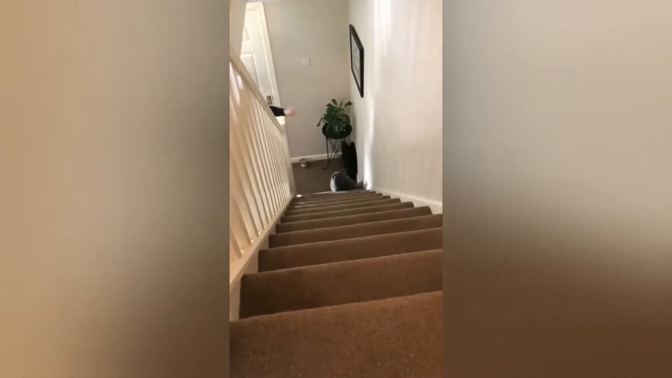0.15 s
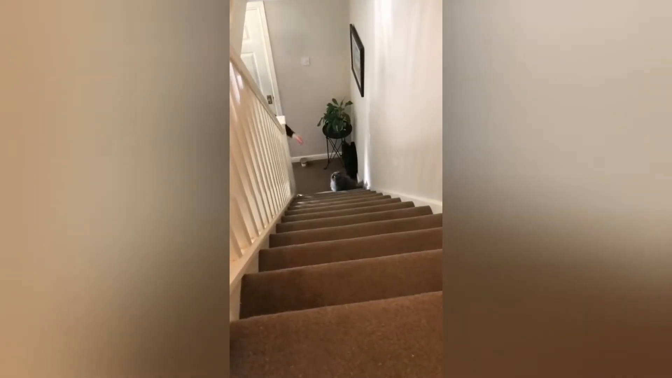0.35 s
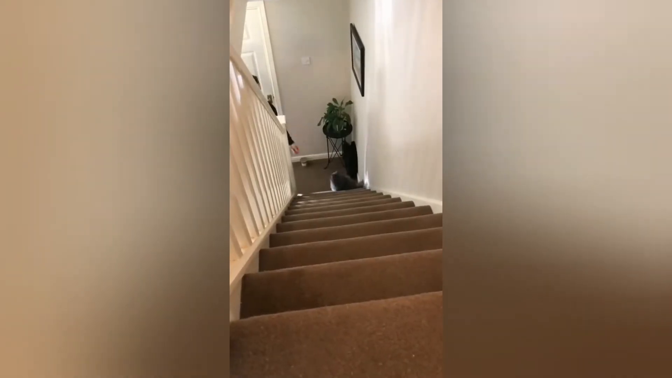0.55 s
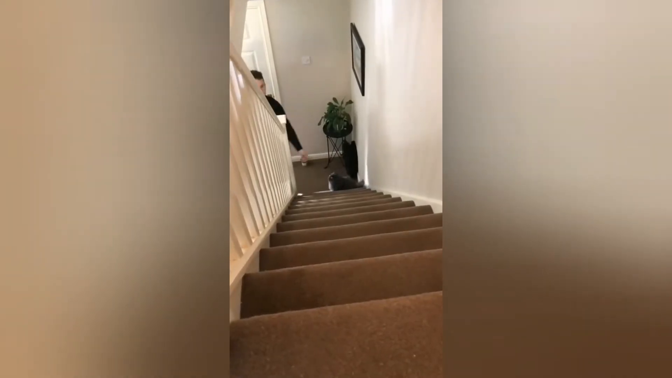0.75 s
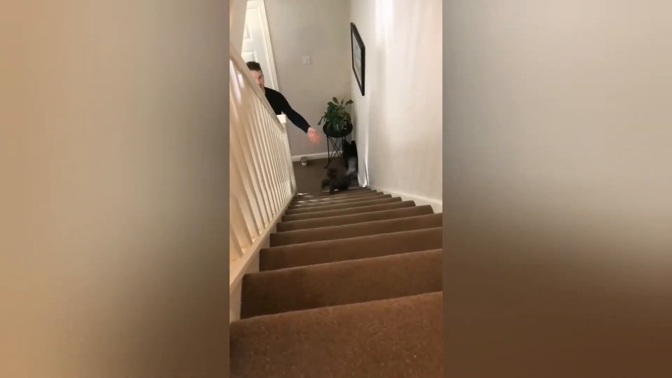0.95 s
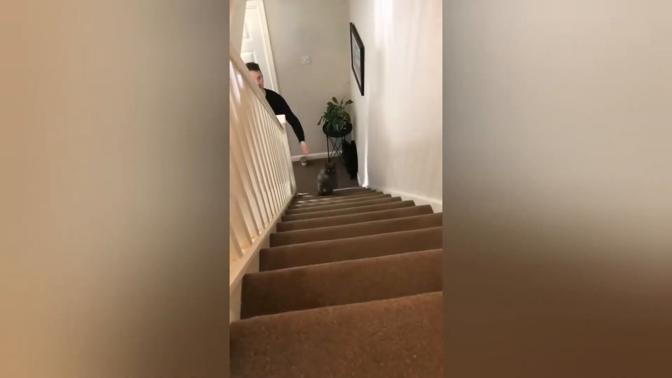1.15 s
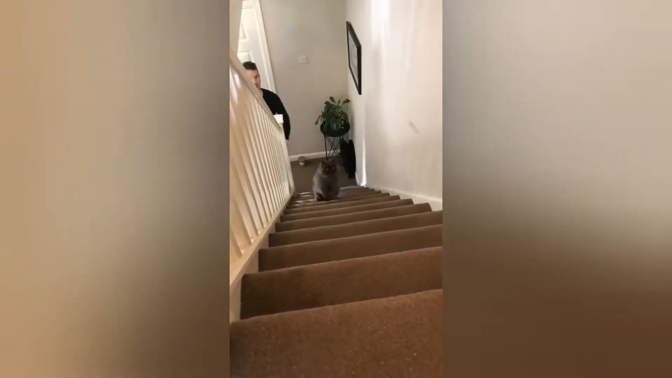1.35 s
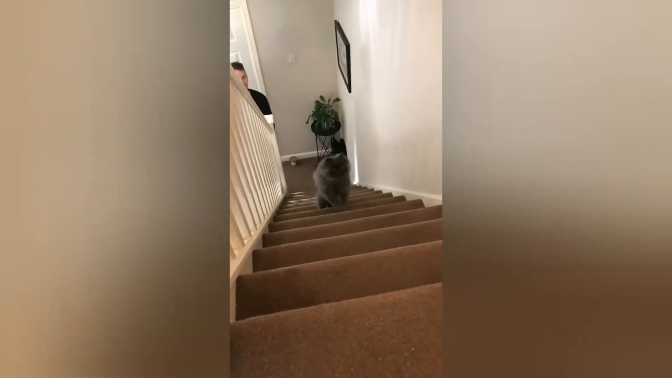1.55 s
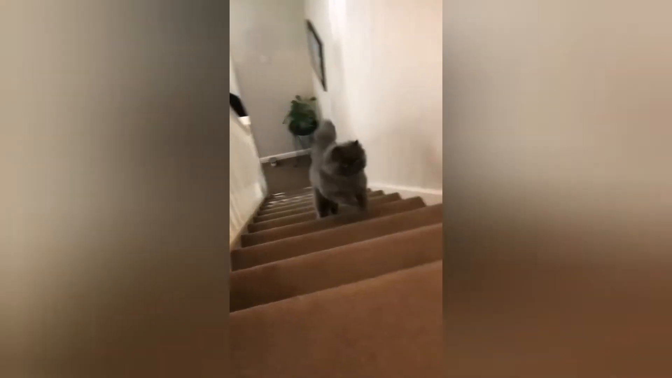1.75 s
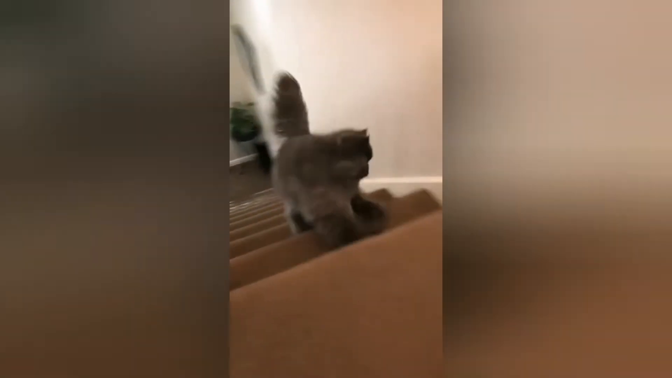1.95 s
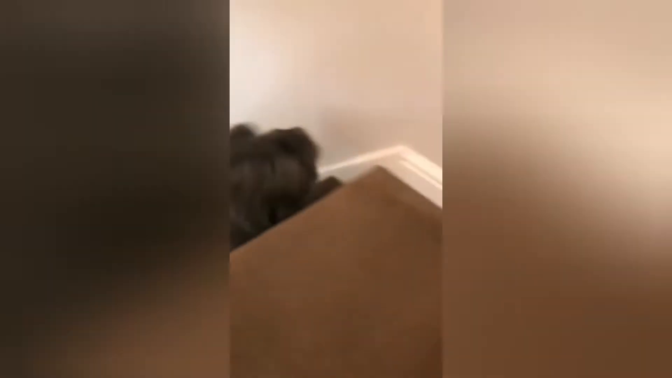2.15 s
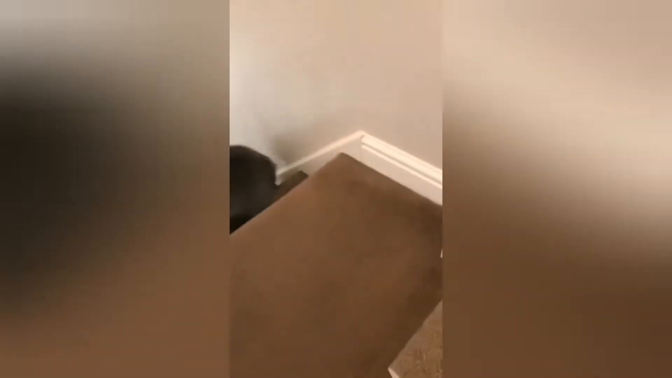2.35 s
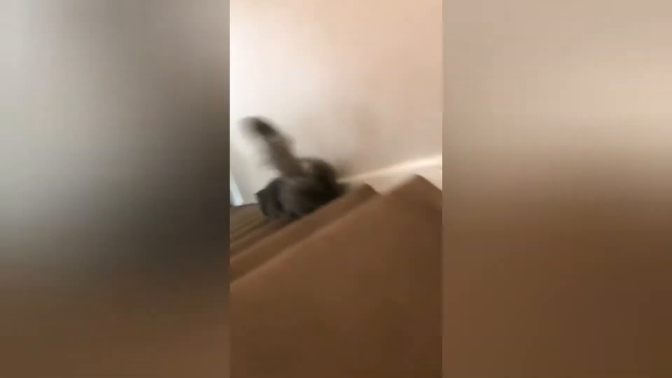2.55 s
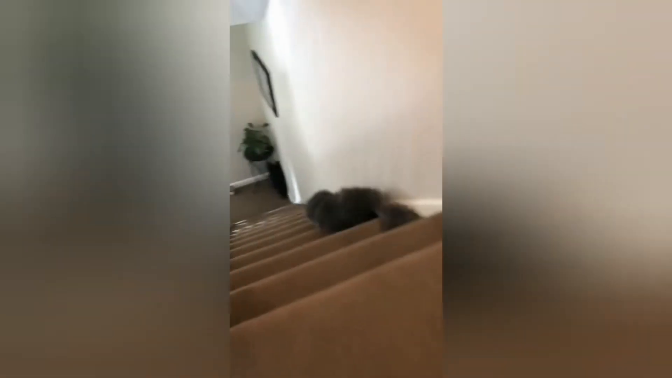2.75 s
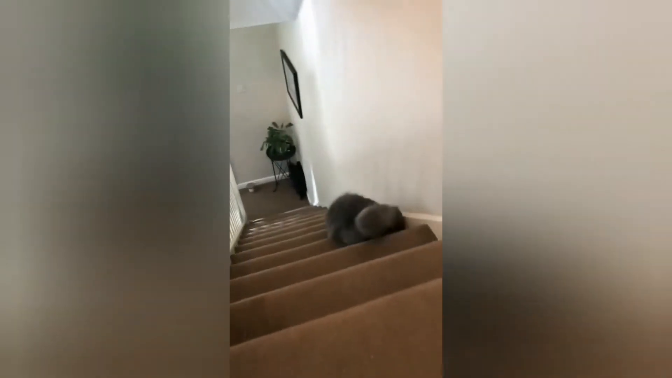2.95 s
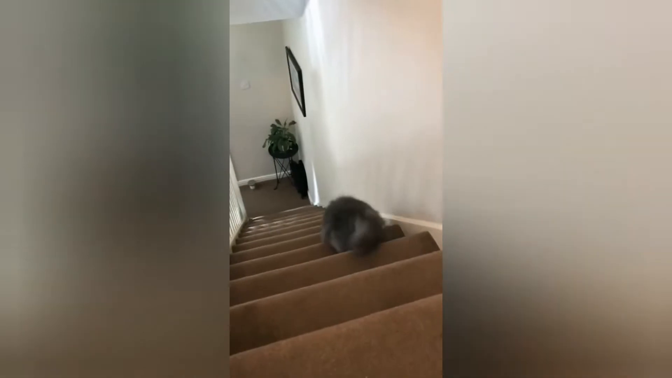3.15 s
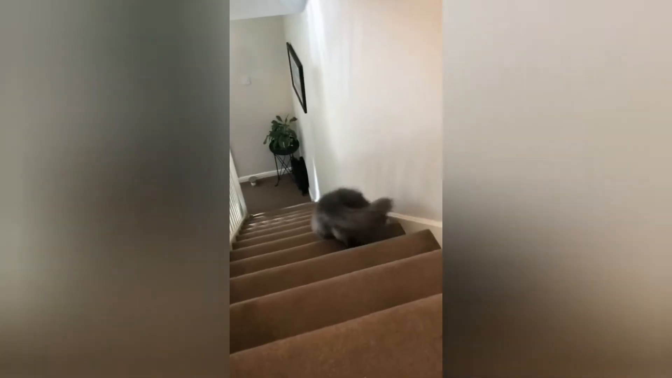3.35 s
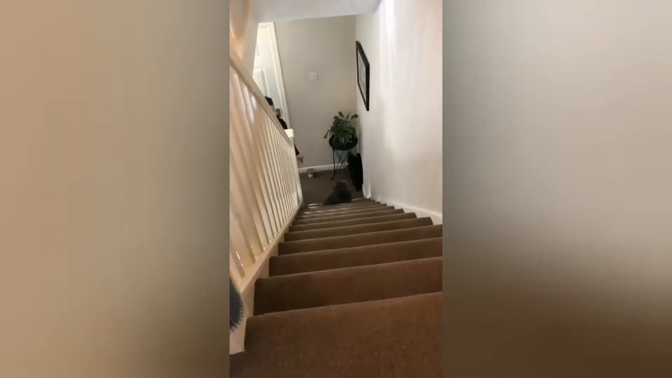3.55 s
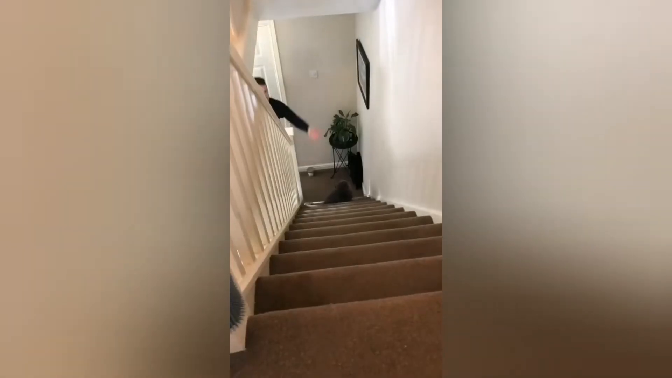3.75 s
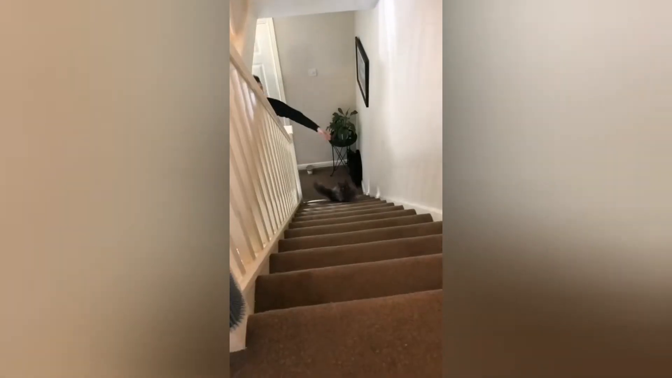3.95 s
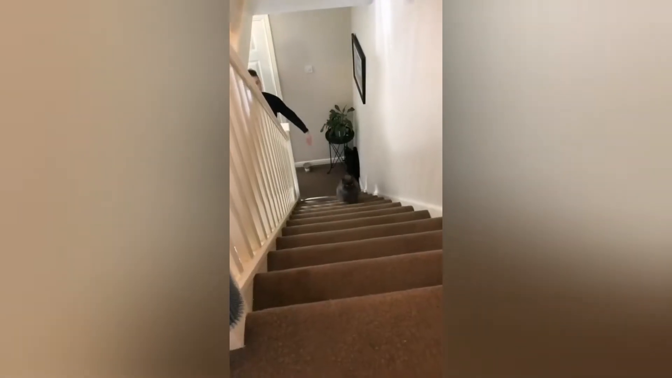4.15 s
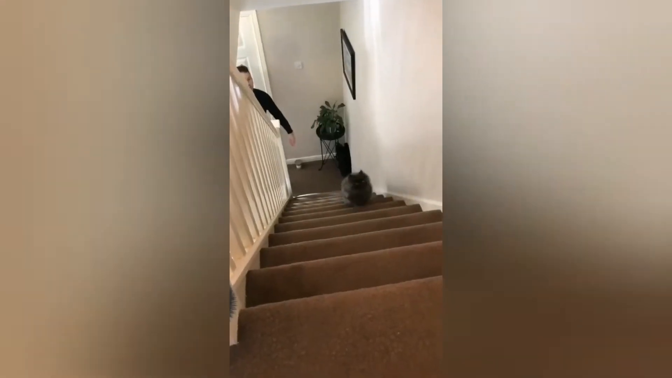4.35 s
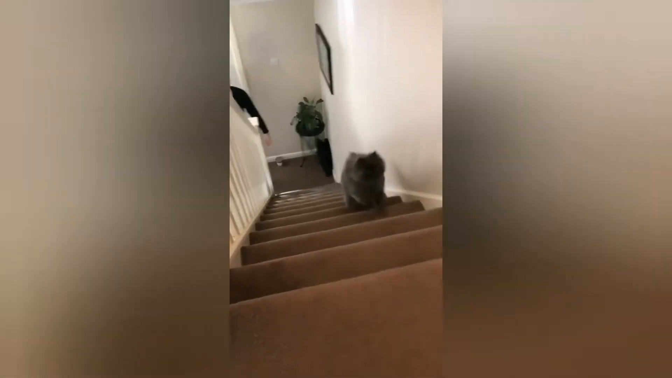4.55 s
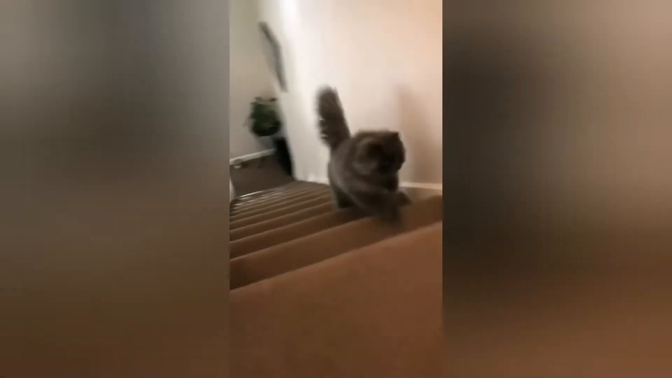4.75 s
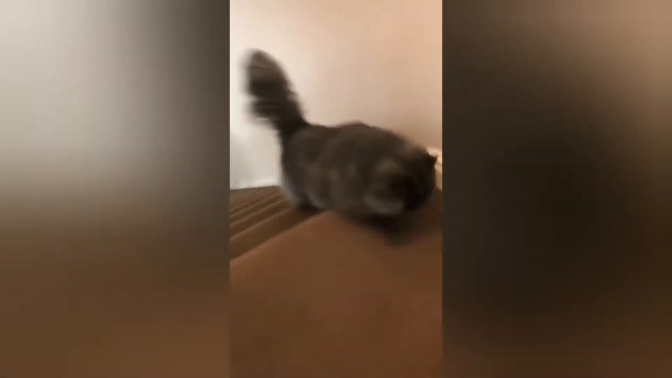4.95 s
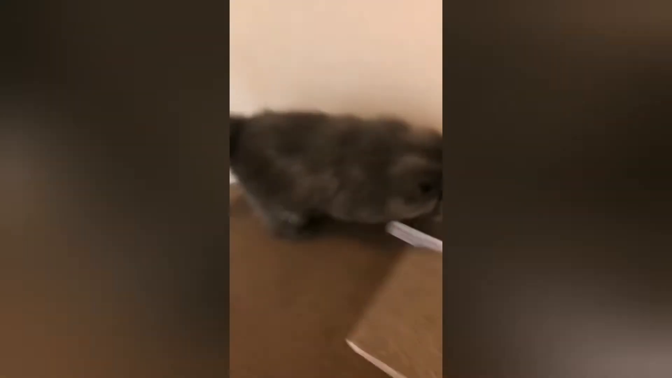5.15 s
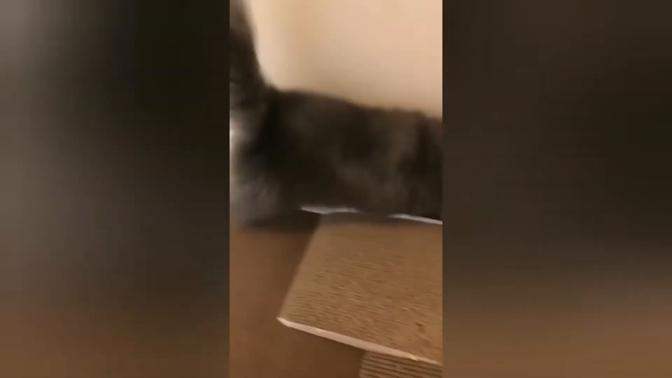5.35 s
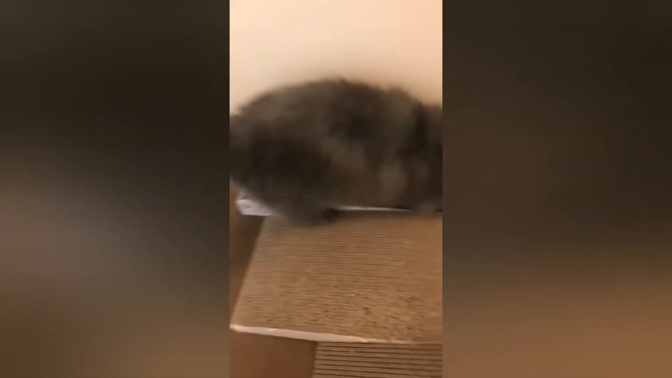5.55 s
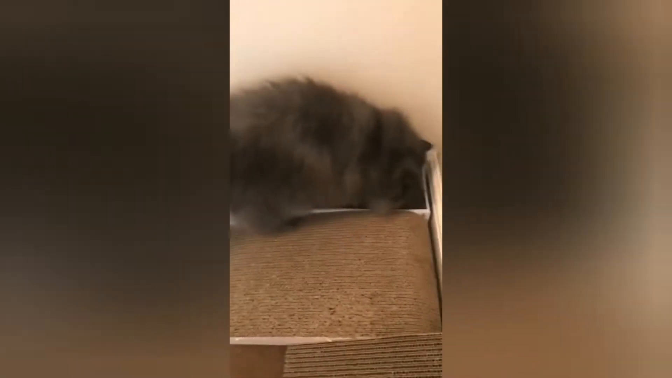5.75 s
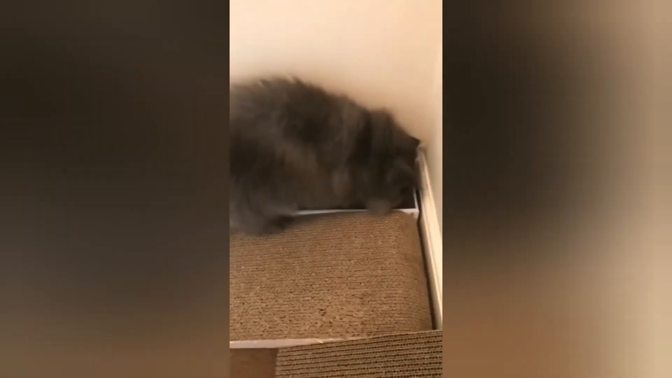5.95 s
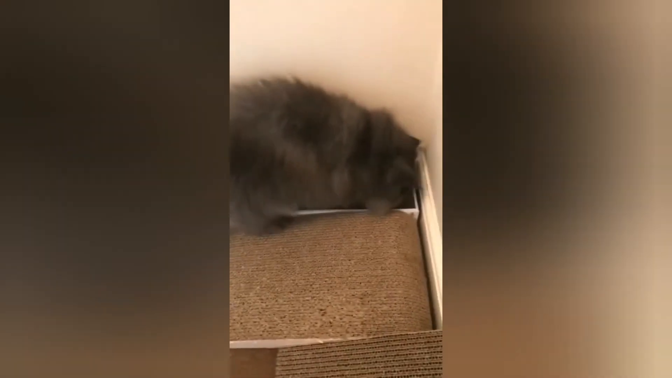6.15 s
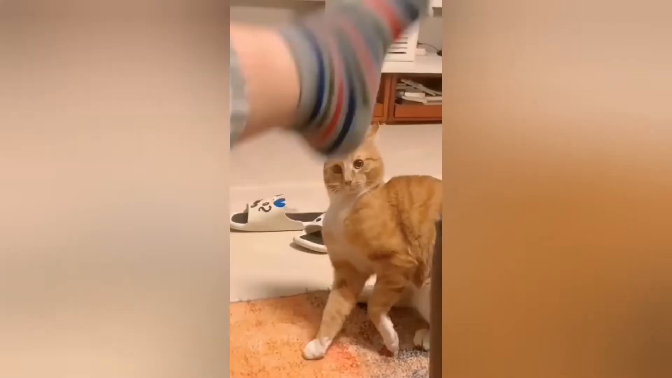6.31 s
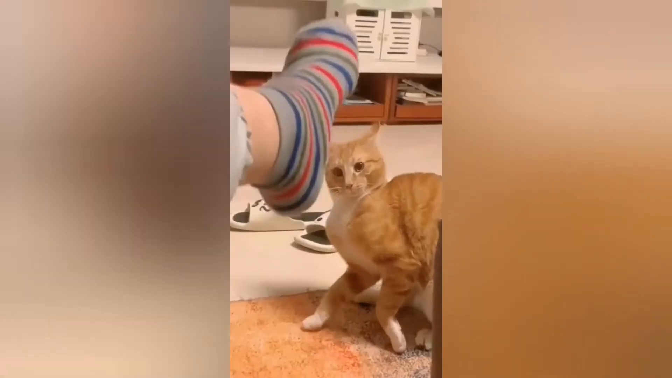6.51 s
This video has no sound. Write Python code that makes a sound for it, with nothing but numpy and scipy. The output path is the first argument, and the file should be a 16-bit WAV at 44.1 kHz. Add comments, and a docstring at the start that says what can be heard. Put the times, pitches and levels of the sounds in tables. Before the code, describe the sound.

A cat bounds up a carpeted wooden staircase in two quick dashes of soft thuds and claw snags, then silence and one bright slap.

```python
"""Soft irregular thumps: a cat bounds up a carpeted wooden staircase in two dashes, then abrupt silence and
one bright slap in another, harder room, with a puff of air. Paws ring the treads as decaying wood modes;
pads scuff and claws snag the pile as shaped noise bursts; an effective distance sets the share of echo.
Late in the second dash the cat lands on a cardboard scratcher: low modes, claps and a rasp.
Still air, brushing fur, shuffling feet and two faint squeaks lie underneath."""
import sys
import numpy as np
from scipy import signal
from scipy.fft import rfft, irfft, next_fast_len
from scipy.io import wavfile
from scipy.ndimage import uniform_filter1d, map_coordinates

SR = 44100
rng = np.random.default_rng(int(sys.argv[2]) if len(sys.argv) > 2 else 0)


def pcm_store(signal):
    """Save signal as 16-bit PCM."""
    levels = np.round(np.clip(np.atleast_2d(signal), -1, 1) * 32767)
    wavfile.write(sys.argv[1], SR, levels.astype(np.int16).T)


N = 290115
TIME = np.arange(N) / SR
T = TIME[:2 * SR // 5]  # time within one event, 0.4 s
TOP_HZ = 14400

# paw landings: t/s, tread thud level/dB, tread f/Hz, riser knock level/dB, riser f/Hz,
# nosing rap level/dB, frame boom level/dB, frame f/Hz, delay until the paw damps the wood/s
PAWS = [(1.128, -35, 276.7, -48.5, 411, -67.5, -37, 127.1, .024),
        (1.213, -35, 304.3, -32.5, 710.5, -42.5, -54.5, 120, 0.0294),
        (1.226, -28, 225.7, -33, 508.3, -44, -49, 140, 0.018),
        (1.241, -25.5, 230.1, -25, 590, -43, -29, 113.5, 0.0217),
        (1.268, -36, 229.4, -38, 820, -53, -43.5, 104.2, .02),
        (1.439, -34, 329.6, -36, 528.3, -48, -33, 113.7, 0.022),
        (1.446, -22.5, 344.4, -29, 575, -45.5, -34.5, 110.8, 0.0142),
        (1.457, -35.5, 358.2, -32, 674.8, -37, -22.5, 109.9, 0.074),
        (1.545, -46, 327, -63, 500, -68.5, -36.5, 106.5, 0.039),
        (1.627, -26, 248.5, -29, 647.6, -36, -52, 141, 0.0206),
        (1.658, -21.5, 216.1, -31.5, 620.5, -38.5, -35.5, 104.8, 0.0234),
        (1.687, -44.5, 301.6, -50.5, 624, -50.5, -32.5, 104, 0.0362),
        (1.811, -30.5, 208, -32, 640.3, -33.5, -39, 110.2, 0.0302),
        (2.013, -29, 276.2, -38.5, 807, -41, -54, 120, 0.0118),
        (2.025, -39, 331.6, -44.5, 595, -46.5, -49.5, 120.1, .02),
        (2.083, -30.5, 244.2, -34, 425.7, -45, -44, 138.8, 0.0146),
        (2.235, -44, 228.7, -59.5, 592, -70, -36, 110.6, 0.0186),
        (2.3, -33, 221.4, -37.5, 437.5, -47, -53, 110, 0.0433),
        (2.449, -33, 414.7, -36.5, 517.4, -46.5, -58, 120, 0.025),
        (2.526, -39, 334.5, -47.5, 547, -63, -46.5, 139.7, 0.0292),
        (2.605, -31.5, 204.7, -59, 688.7, -58.5, -29.5, 140.4, 0.0188),
        (2.692, -39.5, 318.2, -66, 481, -74, -46, 139, 0.017),
        (2.749, -37.5, 390.5, -56.5, 500, -68.5, -43.5, 109.7, 0.067),
        (2.801, -25.5, 360.4, -38.5, 552.2, -46, -36, 116.6, 0.05),
        (2.832, -27, 322.8, -31, 508, -32.5, -28.5, 112, 0.0129),
        (2.844, -36.5, 327.5, -37, 602, -33.5, -37.5, 110.6, 0.0184),
        (2.872, -38.5, 393, -46.5, 493.7, -52, -38, 139, 0.024),
        (2.9, -47, 218, -48.5, 489.5, -63.5, -39, 133, 0.0217),
        (3.125, -53, 355, -78, 498, -77, -57.5, 141, 0.034),
        (3.261, -47, 212.8, -56.5, 568, -65, -66.5, 129, 0.0204),
        (3.559, -57.5, 279, -82, 496, -62, -52, 131, 0.0324),
        (3.7, -58, 258.7, -79, 500, -65.5, -45.5, 92.8, 0.0305),
        (3.946, -43.5, 185, -56, 679, -60, -44, 161, .035),
        (4.038, -66.5, 260, -72, 500, -67.5, -59, 129, 0.017),
        (4.113, -44.5, 196.3, -68.5, 500, -74, -40.5, 171, 0.021),
        (4.149, -38, 265.3, -50.5, 486, -65.5, -40, 138, 0.0256),
        (4.226, -29, 226.4, -31, 641.7, -32.5, -29.5, 105.4, 0.033),
        (4.36, -30, 236, -45, 683.2, -57.5, -35.5, 110.4, 0.037),
        (4.394, -34.5, 297.4, -48.5, 436.4, -64, -39.5, 160, 0.045),
        (4.439, -22, 230, -47.5, 486, -48, -51.5, 131.7, 0.0246),
        (4.545, -33, 232.3, -47, 508, -50.5, -34, 134.9, .024),
        (4.591, -19.5, 234.8, -31, 651.4, -33, -33.5, 104.5, 0.032),
        (4.603, -31, 338.4, -34, 732, -41, -44.5, 130, 0.015),
        (4.62, -25.5, 187, -40.5, 554, -51.5, -27.5, 101.3, 0.036),
        (4.673, -36.5, 190, -49.5, 502, -56.5, -31.5, 109, 0.017),
        (4.716, -36.5, 218.8, -41.5, 495, -60.5, -44, 110, 0.03),
        (4.774, -27.5, 229, -30, 470.3, -43, -29.5, 138.2, 0.016),
        (4.79, -31, 312.2, -31.5, 615, -31.5, -28.5, 105.8, .02),
        (4.83, -29.5, 313, -32, 437.8, -47.5, -25, 131.3, 0.021),
        (4.892, -41.5, 239.4, -39, 651.6, -53.5, -43.5, 129, 0.0155),
        (4.927, -28.5, 231.3, -47, 469, -49.5, -35.5, 144.6, 0.0205),
        (4.992, -38.5, 215, -52.5, 499.7, -66.5, -40, 118.5, 0.022),
        (5.083, -36.5, 225.9, -40.5, 593.5, -57.5, -41, 129.5, 0.018),
        (5.241, -36, 213.1, -44, 508, -68.5, -33.5, 116.7, 0.018),
        (5.358, -31.5, 198.2, -44, 451, -54.5, -28.5, 168.2, .024),
        (5.537, -36, 189.7, -55, 495, -50, -27.5, 113.9, 0.018),
        (5.609, -33.5, 252.8, -59.5, 476, -63.5, -38.5, 150, 0.031),
        (5.671, -38.5, 236.1, -76, 500, -78, -37.5, 132.6, 0.015),
        (5.778, -40, 166.5, -77.5, 496, -62, -43.5, 108, 0.0164),
        (5.919, -48.5, 176.5, -55.5, 590, -56.5, -42.5, 106.3, 0.0185),
        (6.034, -42, 212.3, -49.5, 591.6, -68, -42, 110, 0.016)]
# dashes up the stairs: start t/s, end t/s, relative fur level/dB
DASHES = [(0.799, 2.849, -59), (3.732, 6.101, -61.5)]
# fur spectrum: f/Hz, relative level/dB
FUR = [(300, -19.5), (1200, 6), (3000, -3.5), (6000, -8), (10000, -22), (15000, -20)]


def amp(db):
    """dB to amplitude ratio."""
    return 10 ** (np.asarray(db) / 20)


def unit(x):
    """Scale to rms 1."""
    return x / np.sqrt(np.mean(x ** 2) + 1e-20)


def burst(x):
    """Scale so that the loudest 10 ms have rms 1."""
    return x / np.sqrt(uniform_filter1d(x ** 2, SR // 100).max() + 1e-20)


def along(points, hz):
    """Interpolate (Hz, value) points on a log-frequency axis."""
    f, v = np.transpose(points)
    return np.interp(np.log(hz + 1), np.log(f + 1), v)


def filtered(x, response):
    """Multiply the spectrum of x by a response of frequency."""
    m = next_fast_len(len(x) + SR // 10)
    return irfft(rfft(x, m) * response(np.fft.rfftfreq(m, 1 / SR)), m)[:len(x)]


def band(x, lo_hz, hi_hz, order=3):
    """Causal Butterworth band-pass."""
    edges_hz = [lo_hz, min(hi_hz, SR / 2 - 1)]
    return signal.sosfilt(signal.butter(order, edges_hz, 'band', fs=SR, output='sos'), x)


def lowpass(x, hz):
    """Steep, smooth band limit."""
    return filtered(x, lambda f: 1 / np.sqrt(1 + (f / hz) ** 120))


def noise(spectrum, size, spiky_db=0):
    """Coloured noise of rms 1; spiky_db scatters the level of its 32-sample grains."""
    grain_db = spiky_db * np.repeat(rng.standard_normal(size // 32 + 1), 32)[:size]
    grains = rng.standard_normal(size) * amp(grain_db)
    return unit(filtered(grains, lambda hz: amp(along(spectrum, hz))))


def wobble(rate_hz, size=N):
    """Smooth random curve with rate_hz knots per second."""
    return map_coordinates(rng.standard_normal(int(size * rate_hz / SR) + 4), [TIME[:size] * rate_hz])


def swell(rise_s, t60_s):
    """Soft rise times exponential decay."""
    return (1 - np.exp(-(T / rise_s) ** 2)) * amp(-60 * T / t60_s)


def effective_m(s):
    """Effective distance setting echo share, onset smear and treble loss, linear between points."""
    # t/s, effective distance/m
    points = [(1.1, 0.94), (1.6, 5.5), (2.1, 3.5), (2.5, 5.1), (2.9, 4.66), (3.6, 9.4), (4.3, 6.68),
              (4.8, 4.38), (5.3, 2.62), (6.1, 0.55)]
    return np.interp(s, *np.transpose(points))


def add(track, s, x):
    """Mix x into track at s seconds, truncated at the end."""
    part = track[round(s * SR):][:len(x)]
    part += x[:len(part)]


def stairwell(x, s, hz, wet_1m_db):
    """Convolve with a decaying noise tail; its amplitude grows as the root of effective distance."""
    # stairwell decay: f/Hz, t60/s
    decay = [(100, 0.75), (400, 0.256), (1500, 0.32), (5000, 0.28), (12000, 0.057)]
    tail = rng.standard_normal(len(T)) * swell(0.011, along(decay, hz))
    echo = signal.fftconvolve(x, tail / np.linalg.norm(tail))[:len(T)]
    return x + amp(wet_1m_db) * np.sqrt(abs(effective_m(s))) * echo


def lingering(s, rise_s, t60_s, echo_1m_db, echo_t60_s):
    """Envelope of a noisy contact power-summed with its diffuse stairwell echo."""
    direct = swell(rise_s, t60_s)
    echo = amp(echo_1m_db) * np.sqrt(abs(effective_m(s))) * swell(0.0134, echo_t60_s)
    return np.hypot(direct / direct.max(), echo)


def walls(x, bounce_db):
    """Nearby walls return four quick copies, which comb each contact differently."""
    delays_s = rng.uniform(.002, .013, size=4)

    def comb(hz):
        return 1 + amp(bounce_db) * np.exp(-2j * np.pi * np.outer(delays_s, hz)).sum(axis=0)
    return filtered(x, comb)


def still_air():
    """Steady coloured noise of the quiet house."""
    # f/Hz, relative level/dB
    air = [(18, -50), (30, -23.5), (59, -9.5), (91, 0), (152, -17.5), (186, -13.5), (281, -9), (403, -18.5),
           (871, -26.5), (941, -23), (1190, -29.5), (3770, -36), (4880, -37), (5410, -38.5), (14000, -47.5)]
    return amp(-54.0) * noise(air, N)


def squeaks():
    """Faint far squeaks: sines with unsteady pitch and a soft swell."""
    # t/s, relative level/dB
    events = [(.398, -63.5), (3.678, -65.5)]
    out = np.zeros(N)
    for s, db in events:
        hz = 4980 + 130 * wobble(498, size=len(T))
        squeak = np.sin(2 * np.pi * np.cumsum(hz) / SR) * swell(0.0184, 0.205)
        add(out, s, amp(db - 0.5) * burst(squeak))
    return out


def brushing_fur():
    """Fur brushes the carpet in each dash as fluctuating noise; hairs crackle, less at effective distance."""
    attack_s, release_s = 0.31, .15
    fizz_db, fizz_loss_db_per_m = -2.5, 9.5
    gate = np.zeros(N)
    for start, end, db in DASHES:
        gate += amp(db) * np.interp(TIME, [start, start + attack_s, end, end + release_s], [0, 1, 1, 0])
    brushing = amp(-4.0 + 3.14 * wobble(57)) * noise(FUR, N, spiky_db=2.5)
    hairs = unit(band(noise(FUR, N, spiky_db=3.5), 8000, 14000))
    fizz = amp(fizz_db - fizz_loss_db_per_m * effective_m(TIME) + 2.2 * wobble(13)) * hairs
    return gate * (brushing + fizz)


def shuffling():
    """Feet settle after each landing: low noise whose power sums one swell per thud over an idle floor."""
    # f/Hz, relative level/dB
    spectrum = [(40, -40.5), (100, -2.5), (300, -7.5), (600, -19.5), (1400, -29.5), (4000, -69.5)]
    idle_db, re_thud_db, rise_s, t60_s = -63.5, -11, 0.0089, 0.817  # levels before the trim below
    trim_db, swing_db = -0.5, 2.5
    power = np.full(N, amp(idle_db) ** 2)
    for s, thud_db, *_ in PAWS:
        add(power, s, (amp(thud_db + re_thud_db) * swell(rise_s, t60_s)) ** 2)
    return np.sqrt(power) * amp(trim_db + swing_db * wobble(16)) * noise(spectrum, N)


def faint_ticks():
    """Claws catch single fibres at random moments once the cat is up to speed: short noise snaps."""
    ticks_per_dash_s, speed_up_s = 3, .6  # count is per second of the full dash
    out = np.zeros(N)
    for start, end, _ in DASHES:
        for when, size in rng.random((round(ticks_per_dash_s * (end - start)), 2)):
            s = np.interp(when, [0, 1], [start + speed_up_s, end])
            snap = rng.standard_normal(len(T)) * lingering(s, .001, .02, echo_1m_db=-13.0, echo_t60_s=0.27)
            level = amp(-50 - 4.1 * size) / np.sqrt(abs(effective_m(s)))
            add(out, s, level * burst(band(snap, 1100, 6000, order=1)))
    return out


def scratcher():
    """Cardboard slides, rings in its modes and claps on the landing, then rasps as it settles."""
    # cardboard modes: f/Hz, relative level/dB, t60/s
    modes = [(127.3, -2, 0.1), (172, 0.5, 0.096), (273.5, -4, 0.092), (516, -8.5, 0.018), (570, 8.5, 0.025),
             (1408, -13, 0.091)]
    # taps, clap and rebound: t/s, level/dB, treble relative to it/dB
    claps = [(5.4255, -40.5, -13), (5.4322, -32.5, -20), (5.4369, -25.5, -5), (5.4399, -27.5, -3.5)]
    build_cycles, floor_hz = 0.94, 144
    out, s = np.zeros(N), 5.4375
    slide = band(rng.standard_normal(len(T)), 900, 5000) * swell(0.0029, 0.257)
    add(out, s - .013, amp(-33.5) * burst(slide))
    ring = np.zeros(len(T))
    for hz, db, t60_s in modes:
        ring += amp(db) * swell(build_cycles / hz, t60_s) * np.sin(2 * np.pi * hz * T)
    add(out, s, amp(-19.0) * burst(stairwell(ring, s, hz=498, wet_1m_db=-12.0)))
    push = np.sin(2 * np.pi * floor_hz * T) * swell(0.0045, 0.052)  # floorboards give
    add(out, s, amp(-26.5) * burst(push))
    for at, db, treble_db in claps:
        snap = rng.standard_normal(len(T)) * lingering(at, 0.00074, 0.0253, echo_1m_db=-15.0, echo_t60_s=0.12)
        clap = burst(band(snap, 700, 3200, order=2))
        treble = amp(treble_db) * burst(band(snap, 4300, 12000, order=2))
        add(out, at, amp(db) * (clap + treble))
    rasp = noise(FUR, len(T), spiky_db=3.5) * swell(0.017, 0.71)
    add(out, s, amp(-53) * burst(rasp))
    return out


def slap():
    """Rough noise cracks excite sharp resonances between hard walls; moving air buffets the microphone."""
    # crack spectrum: f/Hz, relative level/dB
    spectrum = [(71, -4.5), (120, -7), (184, -6), (250, -17.5), (310, -8), (480, -19), (680, -18),
                (1080, -9.5), (1700, -8.5), (2620, -19.5), (3950, -12), (4640, -21.5), (5950, -19.5),
                (8500, -17.5), (11000, -90), (18700, -120)]
    # resonances: f/Hz, width/Hz, relative level/dB
    resonances = [(1564, 39, -3), (2064.5, 25.3, -2), (2660, 150, -15), (3366, 45, -8), (4797, 36, -15),
                  (5340, 24, -16), (6060, 38, -11), (6720, 32, -11), (7520, 28, -5.5), (8195, 19.7, -15.5)]
    # slap and after-contacts: t/s, level/dB, t60/s
    hits = [(6.457, -24.5, 0.17), (6.471, -28, 0.106), (6.513, -34.5, 0.37)]
    slap_s, top_hz, rough_db, ring_db = 6.457, 8600, 1.2, -1
    out = np.zeros(N)

    def body(f):
        total = 0
        for k, (hz, width_hz, db) in enumerate(resonances):
            total = total + (-1) ** k * amp(db) * 1j * f * width_hz / (hz * hz - f * f + 1j * f * width_hz)
        return total

    for s, db, t60_s in hits:
        contact = swell(0.00048, t60_s) * amp(rough_db * wobble(310, size=len(T)))
        crack = noise(spectrum, len(T)) * contact
        ring = filtered(rng.standard_normal(len(T)) * contact, body)
        add(out, s, amp(db) * (burst(walls(crack, bounce_db=-10.5)) + amp(ring_db) * burst(ring)))
    tail = noise(spectrum, len(T)) * swell(0.0175, 0.89)
    add(out, slap_s, amp(-28.5) * burst(tail))
    puff = band(rng.standard_normal(len(T)), 30.89, 202, order=2) * swell(0.0069, 0.96)
    add(out, slap_s, amp(-31.0) * burst(puff))
    thump = np.sin(2 * np.pi * 46 * T) * swell(0.00154, 0.121)
    add(out, 6.516, amp(-22) * burst(thump))
    return lowpass(out, top_hz)


def scuffs():
    """Sliding pads pluck dense runs of fibres as uneven noise; effective distance shades the treble."""
    # plucked carpet fibres: f/Hz, relative level/dB
    pile = [(500, -4), (1000, -5), (1700, -0.5), (2800, 0), (5000, -4), (7000, -8.5), (14000, -17.5)]
    # pads swiping the pile: t/s, relative level/dB, rise/s, t60/s, brightness at 8 kHz/dB
    swipes = [(.311, -55.5, 0.0029, 0.145, -5), (1.368, -41.5, 0.0056, 0.25, 1.5),
              (1.429, -26.5, 0.00565, 0.173, 5), (1.959, -31.5, 0.00167, 0.192, 5),
              (2.2976, -36, 0.0031, 0.125, 23.5), (2.61, -60, .005, .1, -14.5),
              (2.693, -47.5, 0.0071, 0.15, -4.5), (2.811, -37.5, .006, 0.075, 14.5),
              (3.23, -52.5, 0.015, 0.208, -10), (3.956, -66, .008, 0.13, -14.5),
              (4.035, -59, 0.0092, 0.13, 6), (4.222, -36.5, 0.003, 0.244, 12),
              (4.583, -30, 0.013, 0.24, 3.5), (4.672, -38, 0.0067, .13, 0),
              (4.769, -24, 0.008, 0.126, -6.5), (5.1088, -45.5, 0.00247, 0.114, 3.5),
              (5.36, -45, 0.0044, 1, 9), (5.605, -42.5, 0.011, 0.24, 20), (5.856, -51.5, 0.013, 0.27, -12)]
    skid_lead_s, skid_db, skid_db_per_knock_db = .003, -10, 0.8424  # skid just before landing; relative level
    skid_rise_s, skid_t60_s = 0.0018, 0.16
    clump_db, clumps_per_s, shade_db_per_m = 1.5, 220, 3  # catch and slip; loss at 8 kHz
    out = np.zeros(N)
    skids = []
    for s, _, _, knock_db, *_ in PAWS:
        level_db = skid_db + skid_db_per_knock_db * knock_db
        skids.append((s - skid_lead_s, level_db, skid_rise_s, skid_t60_s, 0))
    for s, db, rise_s, t60_s, bright_db in skids + list(swipes):
        envelope = lingering(s, rise_s, t60_s, echo_1m_db=-17.5, echo_t60_s=0.457)
        fibres = noise(pile, len(T), spiky_db=1.0) * envelope
        fibres *= amp(clump_db * wobble(clumps_per_s, size=len(T)))
        tilt_db = bright_db - shade_db_per_m * abs(effective_m(s))
        shaded = filtered(fibres, lambda hz: amp(tilt_db * hz / 8000))
        add(out, s, amp(db - 7.0) * burst(walls(shaded, bounce_db=-11)))
    return out


def claws():
    """A claw hooks a carpet loop and lets go: a mid-band tick, a lower pop and a treble sizzle."""
    # t/s, relative level/dB, relative pop level below 2 kHz/dB, snag t60/s
    snags = [(1.628, -24.5, 1.5, 0.032), (1.8136, -29.5, -12, 0.0108), (2.014, -25.5, 4.5, 0.0094),
             (2.102, -36, 0, 0.0095), (2.124, -39, -3.5, 0.018), (2.148, -37, -6.5, 0.019),
             (2.2317, -35.5, -1, 0.0143), (2.2983, -26, -6, 0.015), (2.448, -21, -33.5, 0.0254),
             (2.8354, -41.5, 5, .015), (2.848, -43, 10, .02), (4.6612, -21, -10, 0.0175),
             (4.6632, -15.5, -17.5, 0.0294), (4.7286, -17, -3, 0.017), (4.778, -28.5, 9.5, 0.018),
             (4.7918, -40.5, 15.5, 0.016), (4.8924, -24.5, 4.5, 0.0193), (4.9919, -21.5, -34, 0.0137),
             (5.0361, -41.5, 15, 0.0126), (5.113, -36, -4, 0.0099), (5.163, -55.5, 19.5, 0.037),
             (5.234, -34.5, -1, 0.025), (5.36, -32.5, -20.5, 0.0147), (6.036, -46.5, 13.5, 0.0127)]
    # sizzle hardly grows with the snag and fades with effective distance
    sizzle_db, sizzle_db_per_db, sizzle_loss_db_per_m = -30, 0.24, 3.5  # relative level
    out = np.zeros(N)
    for s, db, pop_db, t60_s in snags:
        snap = rng.standard_normal(len(T)) * lingering(s, 0.00036, t60_s, echo_1m_db=-17, echo_t60_s=0.206)
        fizz = rng.standard_normal(len(T)) * lingering(s, 0.0012, 0.06, echo_1m_db=-21.0, echo_t60_s=0.2)
        tick = burst(band(snap, 1300, 4182, order=2))
        pop = amp(pop_db + 2.5) * burst(band(snap, 870, 1844, order=2))
        treble_db = sizzle_db + sizzle_db_per_db * db - sizzle_loss_db_per_m * effective_m(s)
        sizzle = amp(treble_db) * burst(band(fizz, 5500, 13500, order=2))
        add(out, s, amp(-12.0) * walls(amp(db) * (tick + pop) + sizzle, bounce_db=-16.5))
    return out


def wood(s, press_s, lo_hz, hi_hz, pitch_hz, focus_db_per_oct, rise_s, push_t60_s, board_t60_s,
         modes_db, push_db, damping, wet_1m_db):
    """A struck board rings at its pitch over nearby staircase modes and the dull push of a padded paw."""
    # staircase modes: f/Hz, relative level/dB, t60 at damping 1/s
    modes = [(102.96, -4.5, 0.4), (133.37, -1.5, 0.23), (175, -3, 0.2), (230.81, -2, 0.23),
             (308.53, -6, 0.59), (350.04, -5, 0.2), (390.7, -5.5, 0.2), (485.4, -3, 0.13),
             (540.73, -4, 0.18), (645.46, -7, 0.44), (703, -4.5, 0.14), (768.5, -6, 0.26),
             (873.3, -5, 0.23), (986.5, -2, 0.093), (1072.5, -7, 0.18), (1196.6, -6.5, 0.19),
             (1363, -8.5, 0.24), (1566.4, -6.5, .2), (1746, -11, 0.39)]
    scatter_db, press_loss_db = 3.5, 6.5  # each spot favours other modes; the paw damps the ring

    def favour(hz):
        return amp(-focus_db_per_oct * abs(np.log2((hz + 1) / pitch_hz)))

    board = np.sin(2 * np.pi * pitch_hz * T) * swell(rise_s, board_t60_s)
    ring = np.zeros(len(T))
    for hz, db, t60_s in modes:
        if lo_hz <= hz < hi_hz:
            level = amp(db + rng.normal(0, scatter_db)) * favour(hz)
            ring += level * swell(rise_s, t60_s / damping) * np.sin(2 * np.pi * (hz * T + rng.random()))
    push = band(filtered(rng.standard_normal(len(T)), favour), lo_hz, hi_hz) * swell(rise_s, push_t60_s)
    pressed = amp(-press_loss_db * (1 + np.tanh((T - press_s) / .004)) / 2)
    blow = pressed * (burst(board) + amp(modes_db) * burst(ring) + amp(push_db) * burst(push))
    return burst(stairwell(blow, s, pitch_hz, wet_1m_db))


def paws():
    """Nosing and riser speak first; tread and frame build up slower as the carpet takes the weight."""
    nosing_hz = 1033.4  # front edge of a step
    out = np.zeros(N)
    for s, thud_db, tread_hz, knock_db, riser_hz, rap_db, boom_db, frame_hz, press_s in PAWS:
        spread = np.sqrt(abs(effective_m(s)))  # effective distance smears the onset
        rap = wood(s, press_s, 790, 2000, nosing_hz, focus_db_per_oct=12, rise_s=0.0007 * spread,
                   push_t60_s=0.25, board_t60_s=0.1, modes_db=6, push_db=1.5, damping=1.0, wet_1m_db=-11)
        knock = wood(s, press_s, 350, 917, riser_hz, focus_db_per_oct=7, rise_s=0.0019 * spread,
                     push_t60_s=0.21, board_t60_s=.15, modes_db=-1.0, push_db=-0.5, damping=0.965,
                     wet_1m_db=-12)
        thud = wood(s, press_s, 180, 420, tread_hz, focus_db_per_oct=9, rise_s=0.0026 * spread,
                    push_t60_s=0.084, board_t60_s=0.1487, modes_db=-5.0, push_db=-9, damping=0.763,
                    wet_1m_db=-16.5)
        boom = wood(s, press_s, 90, 178, frame_hz, focus_db_per_oct=4, rise_s=0.00732 * spread,
                    push_t60_s=.2, board_t60_s=0.1743, modes_db=-7.5, push_db=-8.5, damping=.8,
                    wet_1m_db=-21.5)
        add(out, s, amp(rap_db) * rap + amp(knock_db) * knock + amp(thud_db) * thud + amp(boom_db) * boom)
    return band(out, 55, TOP_HZ, order=2)  # the blows carry little below 55 Hz


def scene():
    """The staircase stops abruptly; the slap follows the silence."""
    silence_s, fade_s = 6.12, 0.0038
    house = still_air() + squeaks() + brushing_fur() + shuffling()
    stairs = house + faint_ticks() + scratcher() + scuffs() + claws() + paws()
    gate = np.clip((silence_s - TIME) / fade_s, 0, 1)
    return (stairs * gate + slap())[None]


def record(dry):
    """The recorder removes nearly everything above its band limit."""
    return np.array([lowpass(x, TOP_HZ) for x in dry])


dry = scene()
out = record(dry)
pcm_store(out)
```